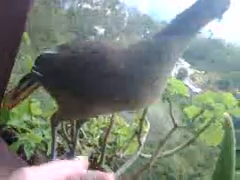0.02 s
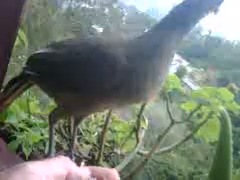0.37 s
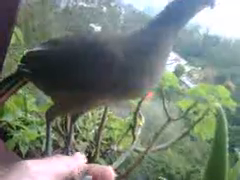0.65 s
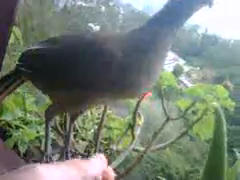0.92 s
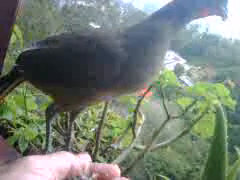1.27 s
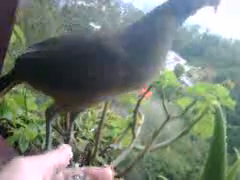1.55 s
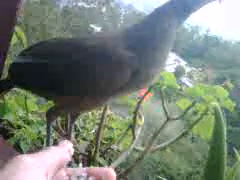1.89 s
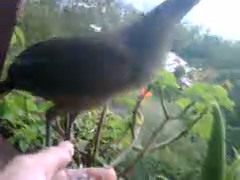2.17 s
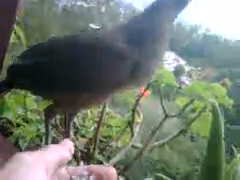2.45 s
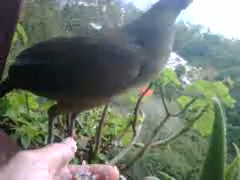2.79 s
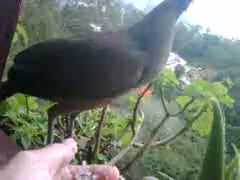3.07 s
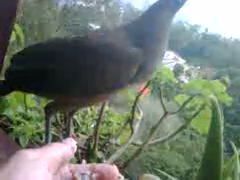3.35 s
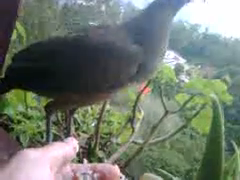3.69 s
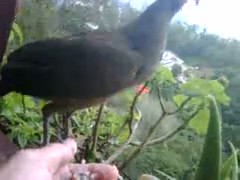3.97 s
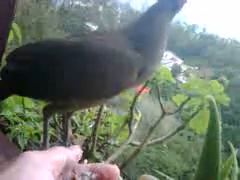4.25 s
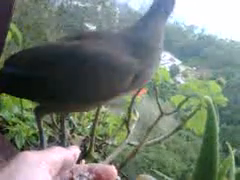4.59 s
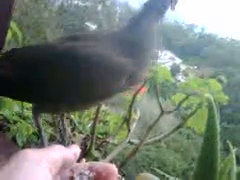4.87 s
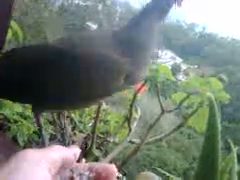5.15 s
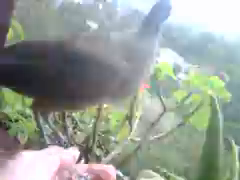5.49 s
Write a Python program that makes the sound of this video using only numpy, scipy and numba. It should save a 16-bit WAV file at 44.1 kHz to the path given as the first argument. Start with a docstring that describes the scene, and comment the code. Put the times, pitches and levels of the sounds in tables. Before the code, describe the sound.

Harsh rhythmic bird shrieks and squawks right at the microphone outdoors, with hoarse rattling calls between them and faint distant replies at first.

```python
"""Chachalacas on a porch above a wooded valley. First a near bird rattles, low and hoarse, and another
answers from far off. From 1.8 s the near bird's partner, right at the microphone, shrieks four bursts
that break between whistle and rasp; rattles fill the gaps. A faint drone swells in the second half.
Throughout: porch echoes, outdoor hush, and a narrow-band recorder that overloads on the loudest peaks."""
import sys
import numpy as np
from scipy import signal
from scipy.fft import rfft, irfft
from scipy.io import wavfile
from scipy.ndimage import uniform_filter1d
from numba import njit

SR = 44100
rng = np.random.default_rng(int(sys.argv[2]) if len(sys.argv) > 2 else 0)


def generate_wav(signal):
    """Clip the signal to [-1, 1] and save it as 16-bit WAV at the path in sys.argv[1]."""
    frames = np.transpose(np.atleast_2d(signal))
    scaled = np.clip(frames, -1, 1) * 32767
    pcm = np.round(scaled).astype(np.int16)
    wavfile.write(sys.argv[1], SR, pcm)


N = 252693
T = np.arange(N) / SR

# rising screams that open the bursts:
# t/s, length/s, level/dB, end level/dB, top f/Hz, roughness/0-1, end roughness/0-1, period doubling/0-1
SCREAM_NOTES = [ (1.803, 0.088, -9.5, -10, 1852, 0.25, 0.37, 0.38),
                (3.04, 0.045, -7, -13.5, 1639, .27, 0.52, 0.4),
                (4.186, .053, -8.5, -15, 1899, 0.25, .85, .7), (5.181, .044, -7.5, -15, 1544, 0.5, 1, 0.8),
                ]
# yelps, a clear lead breaking into a harsher note:
# t/s, length/s, lead/s, lead level/dB, f/Hz, level/dB, end level/dB, roughness/0-1, period doubling/0-1
YELP_NOTES = [ (1.972, 0.068, .017, -9.5, 1860, -13.5, -14.5, 0.46, 0.61),
              (2.069, .05, 0.00604, -2, 1985, -13.5, -13.5, 0.78, 1),
              (2.158, .025, .006, -8, 1380, -7, -19, 0.75, 0.1),
              (2.203, 0.028, .004, -10, 1345, -8, -19, 0.4, 0.05),
              (3.209, .048, .007, -17, 1220, -17, -11, 0.27, 0),
              (3.313, 0.037, .009, -10, 1260, -15, -10.5, 0.29, .1),
              (3.383, 0.018, .003, -16.5, 1440, -9.5, -15.5, 0.38, 0),
              (4.349, 0.065, .009, -18, 1230, -16, -12.5, .24, .05),
              (4.456, .027, .003, -11.5, 1362, -6.5, -20.5, 0.55, 0.1),
              (5.349, .048, .004, -18, 1245, -17.5, -15, 0.7, .1),
              (5.449, 0.029, .01, -7.5, 1355, -6.5, -29.5, 0.45, .1), ]
# squawks late in a burst, opening on a grunt: t/s, length/s, grunt/s, grunt f/Hz, grunt end f/Hz,
# grunt level/dB, level/dB, end level/dB, period doubling/0-1
SQUAWK_NOTES = [ (2.357, .101, .008, 837.3, 935.5, -16, -6.5, -18.5, 0.27),
                (3.56, 0.079, .014, 819.8, 913, -18.5, -8, -16, .06),
                (4.666, 0.056, .029, 855.4, 699.2, -14.5, -13.5, -22.5, 0.7), ]
# gliding whistles: t/s, length/s, f/Hz, end f/Hz, level/dB, end level/dB, roughness/0-1
WHISTLE_NOTES = [ (1.901, 0.01361, 1444, 1410, -21, -18, 0.78), (2.24, 0.003912, 1806, 1800, -15, -26, .45),
                 (3.092, .013, 1506, 1484, -21, -14, 1.01), (3.107, .035, 1294, 1385, -10.5, -8, .19),
                 (3.271, .032, 1219, 1217, -18.5, -18, 0.08),
                 (3.429, 0.0041, 1824, 1782, -10.5, -9.5, 0.33),
                 (3.445, .024, 1892, 1905, -14.5, -17, 0.24), (3.489, .055, 1895, 1900, -18.5, -47, .1),
                 (3.659, .01, 1231, 1218, -17.5, -17, 0.22), (4.246, .045, 1291, 1403, -7.5, -12, .2),
                 (4.418, .02, 1230, 1219, -13, -13.5, .05), (4.526, .009, 1789, 1823, -8, -22.5, 0.31),
                 (4.565, .04, 1830, 1895, -13.5, -15, 0.38), (4.62, .036, 1894, 1788, -28.5, -19.5, 0.41),
                 (4.74, .022, 1217, 1227, -24.5, -15.5, .12), (5.233, .054, 1285, 1401, -12, -11, 0.3),
                 (5.409, 0.021, 1238, 1220, -25.5, -16, 0), (5.517, .012, 1810, 1820, -11.5, -21, 0.36),
                 (5.555, .04, 1899, 1909, -14, -14, 0.3), (5.6, 0.044, 1864, 1820, -13.5, -13.5, 0.3),
                 (5.651, .018, 1392, 1239, -14.5, -13, 0.4), (5.667, 0.033, 1868, 1841, -27, -27.5, 0), ]
# membrane partials: multiple of pitch, level/dB
PARTIALS = [(.5, 9.5), (1, 4.0), (1.5, -3.5), (2, -14)]
# shrieking voice: f/Hz, level/dB
SHRIEK_EQ = [(300, -27), (650, -20.5), (950, -10.5), (1250, -2), (1550, -3), (1850, -2), (2250, -2),
             (2700, 7.5), (3100, 2), (3500, -1), (4200, -28.5)]
# hiss of the shrieking and far birds: f/Hz, level/dB
HISS_EQ = [(25, -46), (90, -22.5), (400, -13.5), (700, -12), (1300, 11.5), (2800, 4), (3500, 2.5),
           (4200, -7)]
# rattles: t/s, length/s, crest position/0-1, level/dB, beak opening/0-1
RATTLE_NOTES = [ (.068, 0.12, 0.36, -23.5, 1), (.21, 0.035, 0.77, -35.5, .25), (.25, 0.03, 0.22, -35.5, .8),
                (.322, 0.041, 0.08, -24, .96), (.383, 0.11, .6, -22, .97), (.608, 0.13, 0.67, -27, .82),
                (.725, 0.031, 0, -33.5, .38), (1.236, 0.018, .5, -31.5, .45), (1.257, .096, 0.4, -23, 0.97),
                (1.385, 0.051, 0.51, -33, .45), (1.49, 0.041, 0.56, -25, .95),
                (1.547, 0.11, 0.56, -22, .99), (1.77, 0.051, 0.99, -27.5, .6),
                (2.565, 0.039, 0.63, -42.5, .15), (2.677, 0.034, 0.2, -21.5, .97),
                (2.735, 0.11, 0.44, -22, .98), (2.96, 0.079, 0.7, -27.5, .55), (3.75, .036, .1, -38.5, .25),
                (3.843, 0.034, 0.13, -22.5, 1), (3.9, 0.11, .55, -22, .97), (4.14, 0.051, 0.95, -30, .5),
                (4.805, 0.085, 0.24, -21, .98), (4.945, 0.024, .6, -34, .05), (5.05, 0.04, 0.43, -25.5, 1),
                (5.105, .077, 0.9, -22.5, 1), ]
# rattling bird's throat, beak open: f/Hz, width/Hz, level/dB
THROAT_MODES = [(1016.4, 120, -1.5), (1716, 130, -10.5), (1982, 83, -3.5), (2222, 45, 3.5),
                (2390, 42.4, 7.5)]
# rattling bird's hiss: f/Hz, level/dB
RATTLE_HISS_EQ = [(25, -17), (90, -6), (400, -4.5), (700, -1.5), (1300, 0), (2800, 3.5), (3500, -4),
                  (4200, -9.5)]
# far calls: t/s, length/s, f/Hz, end f/Hz, level/dB, end level/dB, hiss/tone ratio
FAR_NOTES = [ (0, 0.039, 1275, 1261, -28, -44, 0.21), (0.442, 0.16, 1327, 1368, -23, -55.5, 0.52),
             (0.686, .15, 1304, 1350, -28.5, -45, 0.33), (0.915, 0.095, 1770, 1583, -55.5, -57.5, 1),
             (1.418, 0.056, 1366, 1394, -33.5, -34, 0.62), (1.635, 0.1, 1287, 1358, -40, -30.5, 0.31), ]
# far calls through the trees: f/Hz, level/dB
TREES_EQ = [(2500, 2.5), (3300, -6)]
# reflections off posts and walls: delay/s, gain
PORCH_SLAPS = [(.0044, 0.3), (.01, 0.17), (.03, 0.063)]
# diffuse ring: f/Hz, level/dB
REVERB_EQ = [(400, 0), (1300, 1), (2400, -1.0), (3600, -4.0)]
# outdoor hush: f/Hz, level/dB
HUSH_EQ = [(25, -20.5), (100, -4), (220, -7), (450, -8), (1400, -8.5), (4000, -29.5)]
# low drone: t/s, level/dB
DRONE_LEVELS = [(2.3, -88.5), (2.85, -62.5), (3.4, -75.5), (3.95, -62), (5.0, -62), (5.7, -79)]

BREAK_S = 0.004108  # jump between registers


def shrieking_bird():
    """A whistling membrane doubles its period and, pressed hard, is shaken by a slower one."""
    notes = [scream(*row) for row in SCREAM_NOTES] + [yelp(*row) for row in YELP_NOTES]
    notes += [squawk(*row) for row in SQUAWK_NOTES] + [glide(*row, 0) for row in WHISTLE_NOTES]
    gate, hz, db, rough, doubling = phrase(notes, attack_s=0.003, release_s=0.0057)
    rough, doubling = np.clip(rough, 0, 1), np.clip(doubling, 0, 1)
    jitter = (0.0047 + 0.0349 * rough) * wobble(112.8) + 0.06235 * rough * wobble(429)
    phase = phase_rad(hz * (1 + jitter))
    membrane = 0
    for k, partial_db in PARTIALS:
        flicker_db = (2 if k == 1 else 4) * wobble(55)
        weight = doubling if k % 1 else 1  # half multiples need period doubling
        membrane += weight * undb(partial_db + flicker_db) * np.sin(k * phase)
    slow_membrane = np.sin(phase_rad(630 * (1 + .08 * wobble(300))))
    shake = 1 + rough * (0.75 * slow_membrane + 1.19 * wobble(620))  # sidebands, smeared by flutter
    voice = hold_power(equalise(membrane * shake, SHRIEK_EQ))
    envelope = gate * undb(db + 0.46 * wobble(95))
    return envelope * (voice + (undb(-29) + undb(-8.5) * rough) * hiss(HISS_EQ))


def scream(t_s, length_s, db, end_db, top_hz, rough, end_rough, doubling):
    """A rasp swells, climbs and frays. Points: t/s, f/Hz, level/dB, roughness, doubling."""
    return [(t_s, 1020, db - 7.5, rough, doubling),
            (t_s + .016, 1248.4, db, rough, doubling),
            (t_s + length_s, top_hz, end_db, end_rough, doubling)]


def yelp(t_s, length_s, lead_s, lead_db, hz, db, end_db, rough, doubling):
    """The lead swells and sags; the voice breaks, lands sharp and settles."""
    lead_hz, sag_hz_per_s, lead_rough = 1820, 7203, .22
    return [(t_s, lead_hz, lead_db - 4.5, lead_rough, 0),
            (t_s + lead_s, lead_hz - sag_hz_per_s * lead_s, lead_db, lead_rough, 0),
            (t_s + lead_s + BREAK_S, hz * 1.01904, db, rough, doubling),
            (t_s + length_s, hz, end_db, rough, doubling)]


def squawk(t_s, length_s, grunt_s, grunt_hz, grunt_end_hz, grunt_db, db, end_db, doubling):
    """A swelling grunt breaks upwards, scoops to the main note, then sags and frays."""
    main_hz, scoop, sag = 1275, 0.04934, 0.024
    grunt_rough, rough, end_rough = 0.38, .3, 0.596
    landing_s = t_s + grunt_s + BREAK_S
    return [(t_s, grunt_hz, grunt_db - 1.5, grunt_rough, 0),
            (t_s + grunt_s, grunt_end_hz, grunt_db, grunt_rough, 0),
            (landing_s, main_hz * (1 - scoop), db - 1, rough, doubling),
            (landing_s + .014, main_hz, db, rough, doubling),
            (t_s + length_s, main_hz * (1 - sag), end_db, end_rough, doubling)]


def glide(t_s, length_s, hz, end_hz, db, end_db, *timbre):
    """Pitch and level ramp; timbre holds."""
    return [(t_s, hz, db, *timbre), (t_s + length_s, end_hz, end_db, *timbre)]


def rattling_bird():
    """Strong-weak pulses ring a long windpipe; opening the beak raises pitch and brightness."""
    gate, db, opening = phrase([rattle(*row) for row in RATTLE_NOTES], attack_s=.0042, release_s=.011)
    closed = 1 - np.clip(opening, 0, 1)
    pulse_hz = 198 * (1 - .25 * closed) * (1 + .024 * wobble(150))
    count = np.floor(phase_rad(pulse_hz) / (2 * np.pi))
    strong_weak = 1 - 0.59 * (count % 2)
    pulses = np.diff(count, prepend=0) * strong_weak * undb(0.87 * wobble(150))
    source = pulses + .035 * rng.standard_normal(N)
    tuning = 1 + .012 * wobble(18) - .055 * closed

    def ring(hz, width_hz):
        """One steep throat resonance, shifting as the neck stretches."""
        return bandpass(bandpass(source, hz * tuning, width_hz), hz * tuning, 4 * width_hz)

    tilt_db_per_oct = -2.6 * closed
    throat = sum(ring(hz, width_hz) * undb(mode_db + tilt_db_per_oct * np.log2(hz / THROAT_MODES[0][0]))
                 for hz, width_hz, mode_db in THROAT_MODES)
    grunt = undb(3) * closed ** 2 * ring(720, 210)
    return gate * undb(db) * (hold_power(throat + grunt) + undb(-17.5) * hiss(RATTLE_HISS_EQ))


def rattle(t_s, length_s, crest, db, opening):
    """Level and beak opening arch together. Points: t/s, level/dB, opening."""
    swell_db, fade_db = 4, 9.5
    side = np.linspace(-1, 1, 9)  # 0 at the crest
    times_s = t_s + length_s * np.interp(side, [-1, 0, 1], [0, np.clip(crest, .02, .98), 1])
    slack = np.abs(side) ** 1.6
    drop_db = slack * np.where(side < 0, swell_db, fade_db)
    return np.transpose([times_s, db - drop_db, opening * (1 - 0.21 * slack)])


def far_bird():
    """Trees scatter each hoarse call into a dull, fluttering band."""
    notes = [glide(*row) for row in FAR_NOTES]
    gate, hz, db, hiss_ratio = phrase(notes, attack_s=0.0049, release_s=0.007)
    phase = phase_rad(hz * (1 + .045 * wobble(300)))
    call = gate * undb(db - 2) * (np.sin(phase) + .25 * np.sin(2 * phase) + hiss_ratio * hiss(HISS_EQ))
    scatter = np.exp(-T[:SR // 8] / .018) * rng.standard_normal(SR // 8)
    scattered = signal.fftconvolve(call, scatter / np.linalg.norm(scatter))[:N]
    return equalise(scattered, TREES_EQ)


def hiss(spectrum):
    """Turbulent air of a forced call, rms 1."""
    return unit_rms(equalise(rng.standard_normal(N), spectrum))


def porch(x, t60_s, wet_db, hill_t60_s, hill_db):
    """Slaps off near walls, a short diffuse ring, a faint hillside return."""
    t = T[:SR]
    tail = 0
    for decay_s, db in [(t60_s, wet_db), (hill_t60_s, hill_db)]:
        energy_norm = np.sqrt(2 * np.log(1000) / (decay_s * SR))
        tail += undb(db - 60 * t / decay_s) * rng.standard_normal(SR) * energy_norm
    diffuse = signal.fftconvolve(x, tail * np.minimum(t / 0.009, 1))[:N]
    slaps = sum(gain * np.interp(T - delay_s, T, x, left=0) for delay_s, gain in PORCH_SLAPS)
    return x + slaps + equalise(diffuse, REVERB_EQ)


def valley():
    """Faint outdoor hush; a low wavering drone swells in the second half."""
    hush = undb(-67.5 + 1.5 * wobble(3.3)) * unit_rms(equalise(rng.standard_normal(N), HUSH_EQ))
    tone = np.sin(phase_rad(208 * (1 + 0.0073 * wobble(32))))
    noise_band = unit_rms(bandpass(rng.standard_normal(N), np.full(N, 295.), 70.))
    drone_db = np.interp(T, *np.transpose(DRONE_LEVELS))
    return hush + undb(drone_db) * (tone + 1.8 * noise_band)


def phrase(notes, attack_s, release_s):
    """Note points to curves: gate, then each column after time. The most open gate wins."""
    curves = np.zeros((len(notes[0][0]), N))
    for note in notes:
        times_s, *columns = np.transpose(note)
        near = np.flatnonzero((T > times_s[0] - .1) & (T < times_s[-1] + .2))
        t = T[near]
        early_s, late_s = np.maximum(times_s[0] - t, 0), np.maximum(t - times_s[-1], 0)
        gate = np.exp(-early_s / attack_s - late_s / release_s)
        note_curves = np.array([gate] + [np.interp(t, times_s, column) for column in columns])
        curves[:, near] = np.where(gate > curves[0, near], note_curves, curves[:, near])
    return curves


@njit
def bandpass(x, hz, width_hz):
    """State-variable band-pass, moving centre."""
    y, band, low = np.empty(len(x)), 0., 0.
    for i in range(len(x)):
        g, damping = np.tan(np.pi * hz[i] / SR), width_hz / hz[i]
        v = (band + g * (x[i] + 1e-18 - low)) / (1 + g * (g + damping))
        band, low = 2 * v - band, low + 2 * g * v
        y[i] = damping * v
    return y


def equalise(x, points):
    """Filter by points of f/Hz, level/dB."""
    hz, db = np.transpose(points)
    bins_hz = np.arange(N // 2 + 1) * SR / N
    return irfft(rfft(x) * undb(np.interp(np.log(bins_hz + 1), np.log(hz), db)), N)


def wobble(cutoff_hz):
    """Low-passed random motion, rms 1."""
    lowpass = signal.butter(2, cutoff_hz, fs=SR, output="sos")
    return unit_rms(signal.sosfilt(lowpass, rng.standard_normal(N)))


def phase_rad(hz):
    """Phase of a moving frequency."""
    return 2 * np.pi * np.cumsum(hz) / SR


def hold_power(x):
    """Hold short-term power at 1."""
    return x / np.sqrt(np.abs(uniform_filter1d(x ** 2, size=900)) + 1e-12)


def unit_rms(x):
    """Scale to rms 1."""
    return x / np.sqrt(np.mean(x ** 2))


def undb(db):
    """dB to gain."""
    return 10 ** (np.asarray(db) / 20)


def scene():
    """Three birds heard on the porch, over the valley; mono."""
    birds = shrieking_bird() + undb(-.5) * rattling_bird() + far_bird()
    return (porch(birds, t60_s=0.29, wet_db=-9, hill_t60_s=0.76, hill_db=-20.5) + valley())[None]


def record(dry):
    """The microphone rounds peaks; a telephone-like band remains; its tallest crests clip."""
    ceiling, clip_level = .768, .715
    low_hz, band_hz, top_hz = 58, 3900, 15800
    rounded = ceiling * np.tanh(0.96 * dry / ceiling)
    low_cut = signal.sosfilt(signal.butter(2, low_hz, "high", fs=SR, output="sos"), rounded)
    taps = signal.firwin(101, band_hz, fs=SR, window=("kaiser", 7))
    narrow = signal.fftconvolve(low_cut, taps[None], mode="same")
    clipped = np.clip(narrow, -clip_level, clip_level)
    return signal.sosfilt(signal.ellip(8, .2, 70, top_hz, fs=SR, output="sos"), clipped)


dry = scene()
out = record(dry)
generate_wav(out)
```